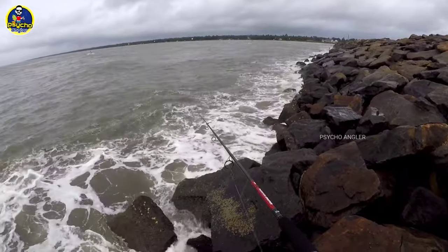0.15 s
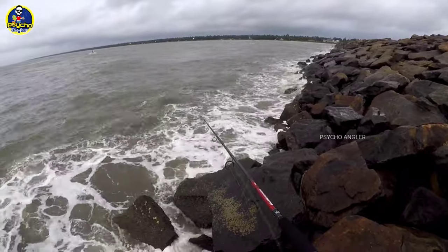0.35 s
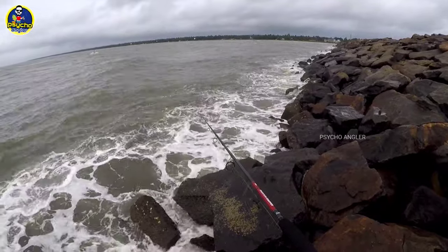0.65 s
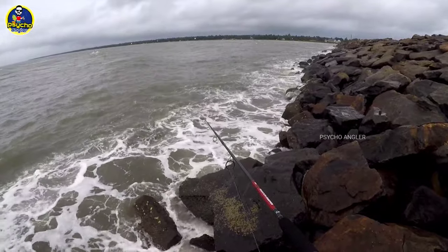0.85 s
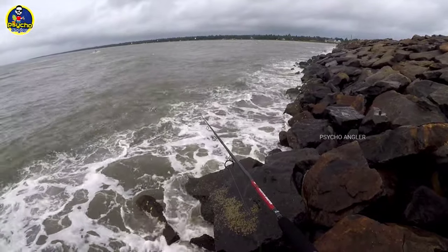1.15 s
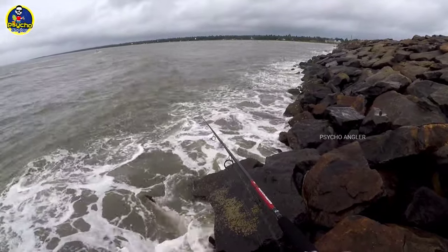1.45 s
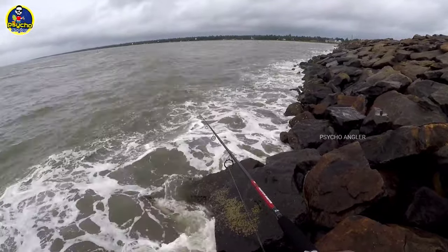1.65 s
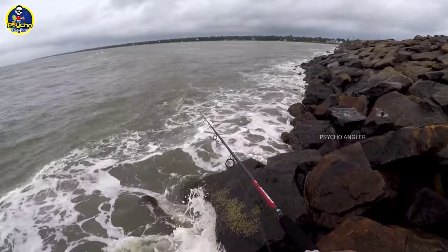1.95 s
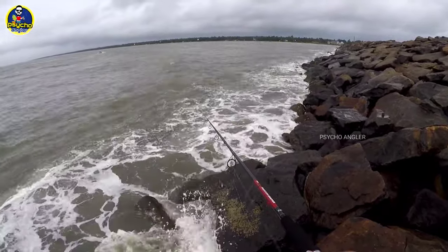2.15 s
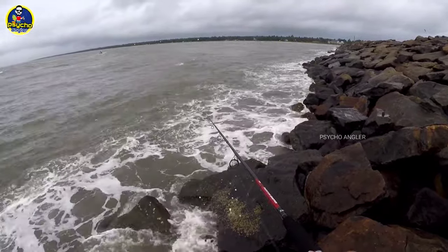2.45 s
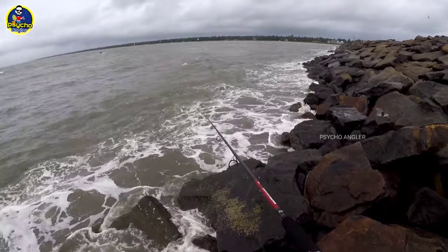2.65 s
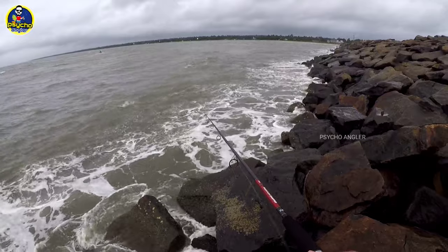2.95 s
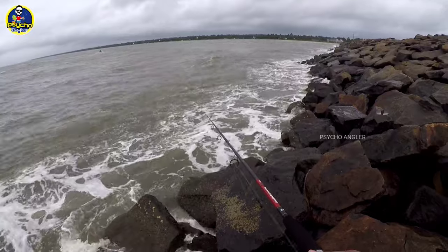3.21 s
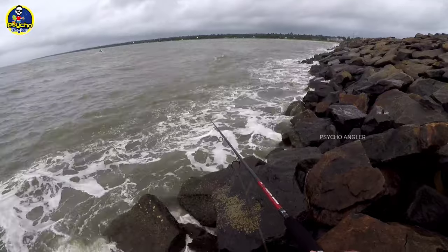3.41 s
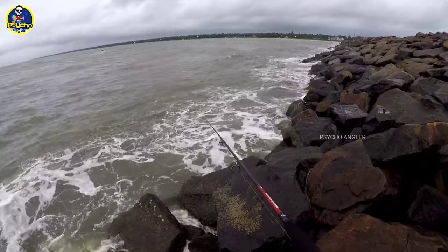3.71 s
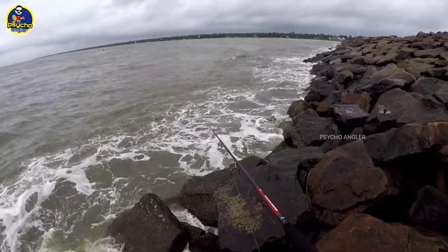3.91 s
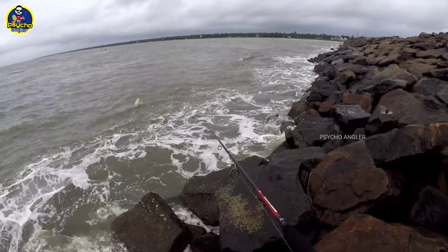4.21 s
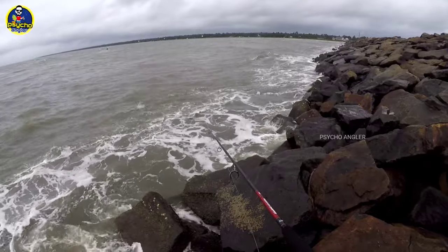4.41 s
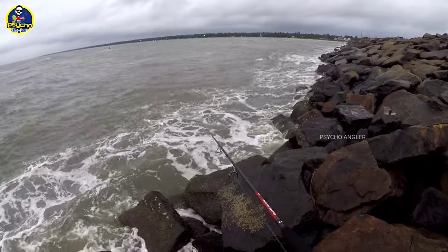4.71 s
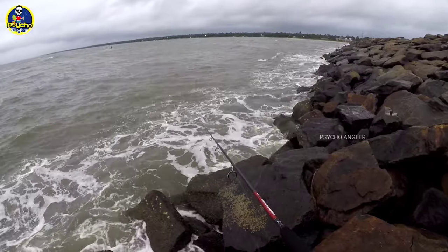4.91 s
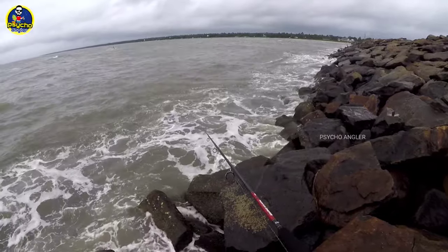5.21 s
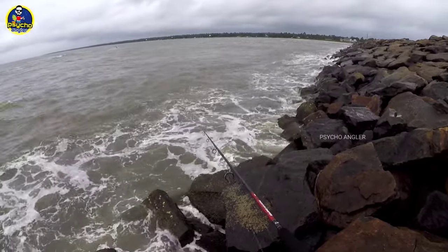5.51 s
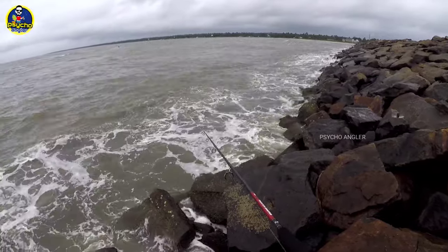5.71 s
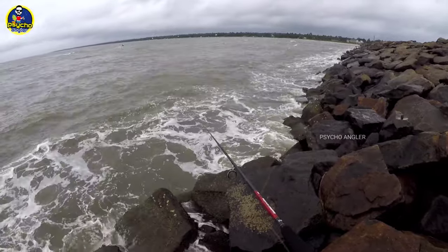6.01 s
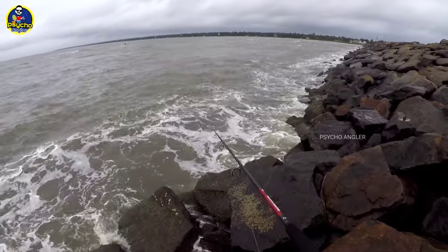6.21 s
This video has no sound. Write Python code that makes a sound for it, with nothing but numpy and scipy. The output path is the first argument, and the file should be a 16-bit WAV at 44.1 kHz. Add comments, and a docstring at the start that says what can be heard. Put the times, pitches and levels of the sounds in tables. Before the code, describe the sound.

Gusty wind rumbles and thuds on a small microphone at the edge of a rocky breakwater. Beneath it, surf churns, sloshes and fizzes the whole time. About a second and a half in, a wave swells and slaps the near rocks with bright spray and hollow plops. The water then eases, with a smaller bubbling splash and a strong wind thump near the end.

```python
"""Wind and surf at a breakwater

Waves wash against boulders, heard by a small camera in a steady wind. Turbulent eddies
buffet the microphone port. Beneath them, resonating air bubbles make the surf churn, slosh
and fizz; single bubbles plop, and sheets of water slap the rock and throw spray. The camera
housing colours the surf and spray, and a fast gain control holds the rumble down."""
import sys
import numpy as np
from scipy import signal
from scipy.fft import rfft, irfft, next_fast_len
from scipy.io import wavfile
from scipy.ndimage import uniform_filter1d, map_coordinates

SR = 44100
rng = np.random.default_rng(int(sys.argv[2]) if len(sys.argv) > 2 else 0)


def unload_wav(signal):
    """Save mono or channel-first audio to the path in sys.argv[1] as 16-bit WAV at rate SR, clipped to [-1, 1]."""
    wavfile.write(
        sys.argv[1],
        SR,
        np.round(np.clip(np.atleast_2d(signal).T, -1, 1) * 32767).astype(np.int16),
    )


N = 280476
TOP_HZ = 15140  # upper band limit


def amp(db):
    """Amplitude ratio of a level in decibels."""
    return 10 ** (np.asarray(db) / 20)


def unit_rms(x):
    """Normalisation to unit mean power."""
    return x / np.sqrt(np.mean(x ** 2) + 1e-20)


def spectrum_db(points, hz):
    """Spectral level, interpolated on a logarithmic frequency axis."""
    knot_hz, db = np.transpose(points)
    return np.interp(np.log(hz + 1), np.log(knot_hz + 1), db)


def envelopes(rows):
    """Piecewise linear envelopes, one for each column after the time."""
    times, *columns = np.transpose(rows)
    return [np.interp(np.arange(N) / SR, times, column) for column in columns]


def wobble(knots_per_s):
    """Slow random modulation: a spline through Gaussian knots."""
    knots = rng.standard_normal(1000)
    return map_coordinates(knots, [np.arange(N) * knots_per_s / SR])


def filtered(x, response):
    """Zero-phase filtering: the spectrum is multiplied by response(hz)."""
    size = next_fast_len(N + SR // 2)
    return irfft(rfft(x, size) * response(np.fft.rfftfreq(size, 1 / SR)), size)[..., :N]


def patchy_noise(depth_db):
    """White noise, amplitude-modulated in random patches of time and frequency."""
    spectra = signal.stft(rng.standard_normal(N), nperseg=512)[2]
    patches = uniform_filter1d(rng.standard_normal(spectra.shape), size=8, axis=0)
    patches = unit_rms(uniform_filter1d(patches, size=8, axis=1))
    return unit_rms(signal.istft(spectra * amp(depth_db * patches), nperseg=512)[1][:N])


def eddies(spectrum, gust_db):
    """Intermittent turbulence: eddies of one size give a noise band that swells at random."""
    noise = filtered(patchy_noise(depth_db=0.85), lambda hz: amp(spectrum_db(spectrum, hz)))
    return unit_rms(noise * amp(gust_db * wobble(knots_per_s=16)))


# Pressure spectra of large, middle and small eddies: (frequency [Hz], spectral level [dB])
THUD_SPECTRUM = [(3, -24), (10, 7), (20, 9), (35, 16.5), (50, 7.5), (65, 5), (100, -5.5), (300, -140)]
BUFFET_SPECTRUM = [(35, -23), (55, 0), (70, -2), (100, -4.5), (118, -9.5), (140, -10.5), (175, -32),
                   (300, -93), (900, -140)]
FLUTTER_SPECTRUM = [(60, -44), (120, 0.5), (170, 4), (220, 0), (250, -2), (350, -9), (600, -47),
                    (1500, -140)]
# Strength of large and middle eddies: (time [s], thud level [dB], buffet level [dB])
THUD_BUFFET_LEVELS = [(0.05, -6.5, -17.5), (0.45, -14.5, -19), (0.62, -10.5, -18.5), (0.76, -13, -18),
                      (0.83, -17, -24), (0.9, -15, -19.5), (1.08, -7.5, -17), (1.35, -19, -16.5),
                      (1.8, -10, -17.5), (2.15, -10.5, -18.5), (2.45, -7, -14.5), (2.66, -15, -18.5),
                      (2.75, -14.5, -13), (3.1, -10.5, -16), (3.28, -14.5, -24.5), (3.45, -12.5, -18),
                      (3.75, -9, -18), (4.0, -8.5, -15.5), (4.18, -16.5, -20.5), (4.42, -9.5, -26),
                      (4.56, -18, -14.5), (4.78, -8.5, -15.5), (5.02, -13.5, -16), (5.17, -11, -15.5),
                      (5.45, -13, -22.5), (5.75, -15, -13), (5.95, -15, -18), (6.07, 2, -18),
                      (6.11, -21, -36), (6.155, -42, -11.5), (6.2, -5, -16), (6.32, -13, -18.5)]
# Strength of small eddies: (time [s], level [dB])
FLUTTER_LEVELS = [(0.05, -36), (0.25, -29.5), (0.52, -26.5), (0.68, -37.5), (0.9, -31), (1.0, -27),
                  (1.2, -25), (1.45, -27.5), (1.8, -25), (2.1, -31.5), (2.6, -32.5), (2.75, -26),
                  (2.9, -33), (3.2, -30), (3.35, -27), (3.58, -34.5), (3.75, -29.5), (4.3, -35),
                  (4.62, -32.5), (4.85, -37.5), (5.2, -29.5), (5.45, -35.5), (5.7, -33.5), (6.3, -38)]

def wind():
    """Turbulent pressure on the microphone port: the larger the eddy, the lower its frequency."""
    thud_db, buffet_db = envelopes(THUD_BUFFET_LEVELS)
    flutter_db, = envelopes(FLUTTER_LEVELS)
    thud = amp(thud_db) * eddies(THUD_SPECTRUM, gust_db=3)
    buffet = amp(buffet_db) * eddies(BUFFET_SPECTRUM, gust_db=3)
    flutter = amp(flutter_db) * eddies(FLUTTER_SPECTRUM, gust_db=1.8)
    return thud + buffet + flutter


def bubbles(onset_s, gain, hz, cycles, glide, samples):
    """Bubble resonance: damped sines whose pitch climbs as each bubble nears the surface."""
    t = np.arange(samples) / SR
    age = t * (hz / cycles)[:, None]  # in lifetimes
    phase = 2 * np.pi * hz[:, None] * t * (1 + glide * age / 2)
    envelope = np.exp(-3 * age) * (1 - np.exp(-10 * age)) * (age < 2.5)
    rings = gain[:, None] * envelope * np.sin(phase)
    indices = (onset_s * SR).astype(int)[:, None] + np.arange(samples)
    return np.bincount(indices.ravel(), rings.ravel(), N + samples)[:N]


# Motions of the surf: (time [s], churn [dB], slosh [dB], foam wash [dB], spray [dB])
SURF_MOTIONS = [(0.05, -43.5, -38.5, -42, -56.5), (0.22, -38, -42, -44.5, -57.5),
                (0.47, -34, -37, -41.5, -57), (0.78, -37.5, -39.5, -45, -56.5),
                (1.0, -35.5, -39.5, -43.5, -57), (1.22, -34.5, -36.5, -40.5, -53.5),
                (1.42, -36.5, -38.5, -43, -56), (1.56, -32, -36.5, -40.5, -53),
                (1.78, -34, -34.5, -39, -52.5), (1.98, -27, -35, -38, -52), (2.2, -34, -33, -38.5, -54),
                (2.33, -34, -34, -36.5, -52.5), (2.44, -34.5, -34, -38.5, -55),
                (2.57, -33, -37, -41, -56.5), (2.75, -31.5, -38.5, -43.5, -60),
                (2.9, -33, -39, -42.5, -57.5), (3.1, -35, -36.5, -40.5, -55.5), (3.3, -38, -39, -43.5, -56),
                (3.6, -35, -37, -42.5, -55.5), (3.8, -36, -38.5, -44.5, -57), (4.0, -40.5, -37, -44, -55.5),
                (4.2, -37.5, -38.5, -44, -57.5), (4.5, -37, -39, -43, -55), (4.72, -37.5, -41, -46, -56.5),
                (4.88, -40.5, -43, -47, -57), (5.0, -45, -42.5, -47, -57), (5.12, -34, -41.5, -48, -55.5),
                (5.25, -38, -39, -46.5, -57.5), (5.55, -39.5, -40, -43.5, -55.5),
                (5.72, -44, -38.5, -41.5, -56.5), (5.82, -41, -35.5, -40.5, -56.5),
                (5.9, -37, -38, -42, -54), (5.99, -39.5, -37.5, -42.5, -56), (6.12, -47, -40.5, -44, -58),
                (6.3, -43.5, -41.5, -42.5, -58.5)]
# Short surges between the rocks: (time [s], churn lift [dB], slosh and wash lift [dB])
ROCK_SURGES = [(.45, 5, 0), (.54, 1, -0.5), (1.235, 4, 0.5), (1.48, 11, 0), (1.64, 4, 2.5), (1.76, 1, 2),
               (1.92, -8, 3), (1.96, -6, 1.5), (2.2, 6, 1.5), (3.34, 13, -2.5), (3.9, 3, 2.5),
               (4.15, 11, -3.5), (4.41, 12, -1.5), (4.73, 1, 0.5), (4.95, 11, -1), (5.8, 9, -1),
               (5.88, 0, -2), (5.95, -4, 2)]
# Response of each bubble size: (base level [dB], weights of churn, slosh, wash, spray [dB/dB])
SIZE_RESPONSES = [(-36, 0.58, 0.045, .05, 0.34), (-39.5, 0.091, 0.95, .05, -0.29),
                  (-42, 0.05, 0.7, 0.24, 0.15), (-45.5, 0.14, 0.24, 0.55, 0.05),
                  (-49, 0.18, .05, 1.1, 0.015), (-50.5, 0.05, .05, 0.92, 0.35),
                  (-58, 0.021, .05, 0.21, 0.82), (-65, .05, .05, 0.44, 0.66)]

def surf_levels():
    """Amplitude modulation: each bubble size follows a weighted sum of the water's swings in dB."""
    churn, slosh, wash, spray = [db - db.mean() for db in envelopes(SURF_MOTIONS)]
    t = np.arange(N) / SR
    half_width_s = 0.016
    for centre_s, churn_lift_db, wash_lift_db in ROCK_SURGES:
        surge = np.exp(-((t - centre_s) / half_width_s) ** 2)
        churn += churn_lift_db * surge
        slosh += wash_lift_db * surge
        wash += wash_lift_db * surge
    return [db + np.dot(weights, [churn, slosh, wash, spray]) for db, *weights in SIZE_RESPONSES]


# Water sound as the housing passes it: (frequency [Hz], spectral level [dB])
HOUSING_SPECTRUM = [(200, -12), (400, -2.5), (627, -2), (1060, -9), (1350, -12), (1820, -12.5),
                    (2140, -17.5), (2420, -16.8), (2690, -19.3), (3000, -17.5), (3500, -18), (3980, -20),
                    (4500, -18), (4800, -18.5), (5100, -23), (6100, -22), (7000, -30), (7660, -34),
                    (9300, -33), (11200, -40.5), (12300, -36.5), (13300, -42.5), (15000, -50)]
# Band edges of the eight bubble sizes, largest bubbles first: (frequency [Hz])
BAND_EDGES = [250, 700, 1200, 2300, 3900, 5050, 7300, 11000, 16000]
# Bubbles of each size: (rate [1/s], lifetime [cycles], near power share [0-1], patchiness [dB])
POPULATIONS = [(226, 2.3, 0, 0.66), (435, 6.6, 0, 0.5), (714, 3.2, 0, 0.55), (750, 3.1, 0.13, 0.05),
               (515, 3.6, 0.4, 0.5), (710, 4.7, 0.16, 1), (2320, 3.3, 0, 1.1), (1200, 4, 0, 1.1)]

def surf():
    """Incoherent summation: countless far bubbles merge into noise; near ones stand out as grains."""
    common_db = 0.074 * wobble(17) + 0.55 * wobble(30)  # all sizes swell together
    total = np.zeros(N)
    bands = zip(surf_levels(), BAND_EDGES, BAND_EDGES[1:], POPULATIONS)
    for level_db, low_hz, high_hz, (rate, cycles, near_share, patch_db) in bands:
        when, band_position, distance = rng.random((int(rate * N / SR), 3)).T
        pitch_hz = low_hz * (min(high_hz, TOP_HZ) / low_hz) ** band_position
        gain = amp(-3 * np.log(distance + 0.01))
        grains = bubbles(when * N / SR, gain, pitch_hz, cycles,
                         glide=0.065, samples=int(2 * cycles / low_hz * SR))
        band_fraction = (high_hz - low_hz) / (SR / 2)  # part of white noise's power in this band
        near = np.sqrt(near_share * band_fraction) * unit_rms(grains)
        far = np.sqrt(1 - near_share) * patchy_noise(patch_db)
        bandpass = lambda hz: 1 / np.sqrt((1 + (low_hz / (hz + 1)) ** 24) * (1 + (hz / high_hz) ** 24))
        water = filtered(far + near, lambda hz: bandpass(hz) * amp(spectrum_db(HOUSING_SPECTRUM, hz)))
        total += amp(level_db + common_db) * unit_rms(water)
    return total


# Single clear bubbles: (time [s], gain [dB], pitch [Hz], lifetime [cycles])
CLEAR_BUBBLES = [(0.536, -15, 1480, 4.7), (.601, -23, 670, 5.5), (0.892, -24, 4850, 9),
                 (.899, -22, 4100, 3.5), (.92, -29, 4550, 14), (.935, -27, 3020, 10),
                 (1.045, -18, 4500, 3.5), (1.109, -29, 4400, 12), (1.214, -29, 4450, 12),
                 (1.235, -20, 3400, 9.7), (1.266, -22, 4100, 18), (1.299, -24, 4300, 8.7),
                 (1.595, -27, 533, 8), (1.743, -27, 790, 7.7), (1.77, -27, 1460, 33), (1.855, -19, 4600, 9),
                 (1.914, -10, 467, 5), (1.921, -23, 1600, 9), (1.954, -10.5, 517, 6), (1.975, -9, 590, 3),
                 (1.994, -22, 4500, 7.2), (2.07, -17, 1040, 5.1), (2.203, -23, 700, 3.4),
                 (2.245, -22, 1540, 14), (2.386, -18, 890, 9.8), (2.575, -19, 1340, 7.7),
                 (2.576, -35, 620, 6.1), (3.336, -20, 407, 5.3), (3.687, -20, 1050, 8.7),
                 (3.899, -21, 610, 8), (4.149, -19, 552, 18), (4.48, -26, 2760, 9.8), (4.718, -20, 850, 9),
                 (4.72, -25, 1200, 6), (4.741, -25, 446, 12), (4.767, -27, 1150, 8), (4.953, -17, 604, 3.1),
                 (5.35, -26, 3390, 9), (5.702, -22, 1150, 7), (5.739, -27, 3500, 9),
                 (5.788, -23, 4600, 7.3), (5.791, -23, 640, 7.4), (5.785, -26, 866, 20),
                 (5.812, -24, 820, 14), (5.822, -28, 1060, 12), (5.824, -22.5, 1490, 11),
                 (5.841, -22, 790, 9.5), (5.88, -24, 830, 16), (5.899, -26, 950, 12), (5.917, -32, 630, 10),
                 (5.943, -24, 835, 15), (5.956, -12.5, 1110, 4.3), (5.99, -27, 1000, 8.9)]

def plops():
    """Free oscillation of single bubbles: low where air pockets burst, high where drops land."""
    onset_s, db, hz, cycles = np.transpose(CLEAR_BUBBLES)
    return bubbles(onset_s, amp(db), hz, cycles, glide=0.16, samples=4000)


# Sheets of water striking the near rock: (time [s], level [dB], 60 dB decay time [s], rise time [s])
ROCK_SLAPS = [(1.545, -46, .12, .012), (1.606, -30, .09, .01), (1.7, -44, .04, .003),
              (1.741, -43, .04, .003), (1.8, -43, .08, .005), (1.815, -44, .07, .004),
              (1.905, -45, .08, .004), (1.93, -48, .1, .006), (1.993, -42, .04, .002),
              (2.21, -49, .06, .004), (2.3, -48, .12, .008), (2.38, -48, .05, .003),
              (2.425, -45, .03, .002), (2.452, -38, .1, .015), (5.659, -43, .1, .005),
              (5.785, -50, .08, .005)]

def slaps():
    """Impact breaks water into spray: bright hiss and ringing droplets that decay exponentially."""
    t, envelope = np.arange(N) / SR, np.zeros(N)
    for onset_s, db, decay_s, rise_s in ROCK_SLAPS:
        age_s = np.maximum(t - onset_s, 0)
        envelope += amp(db - 60 * age_s / decay_s) * (1 - np.exp(-age_s / rise_s))
    when, distance, band_position = rng.random((9000, 3)).T
    gain = amp(-4 * np.log(distance + 0.01))
    pitch_hz = 5000 * 1.7 ** band_position
    droplets = bubbles(when * N / SR, gain, pitch_hz, cycles=8, glide=0.1, samples=180)
    spray = patchy_noise(depth_db=1.3) + 0.87 * unit_rms(droplets)
    tilt_db = lambda hz: 6.9 * np.log2((hz + 1) / 7000)
    bright = lambda hz: amp(spectrum_db(HOUSING_SPECTRUM, hz) + tilt_db(hz)) * (hz > 2500)
    return envelope * unit_rms(filtered(spray, bright))


def scene():
    """Superposition: the pressures of wind and water add at one microphone."""
    return (wind() + surf() + plops() + slaps())[None]


def record(dry):
    """Dynamic range compression: bass swells are turned down and rounded, then all is band-limited."""
    crossover_hz, threshold, ceiling = 150, 0.4, 0.62
    bass = filtered(dry, lambda hz: 1 / (1 + (hz / crossover_hz) ** 6))
    envelope = np.abs(signal.hilbert(bass, next_fast_len(N))[:, :N])
    envelope = uniform_filter1d(envelope, size=1000, axis=1)  # 23 ms average
    compressed = bass * (1 + (envelope / threshold) ** 4) ** (-1 / 5.5)
    rounded = compressed / (1 + np.abs(compressed / ceiling) ** 6) ** (1 / 6)
    return filtered(dry - bass + rounded, lambda hz: hz < TOP_HZ)


dry = scene()
out = record(dry)
unload_wav(out)
```